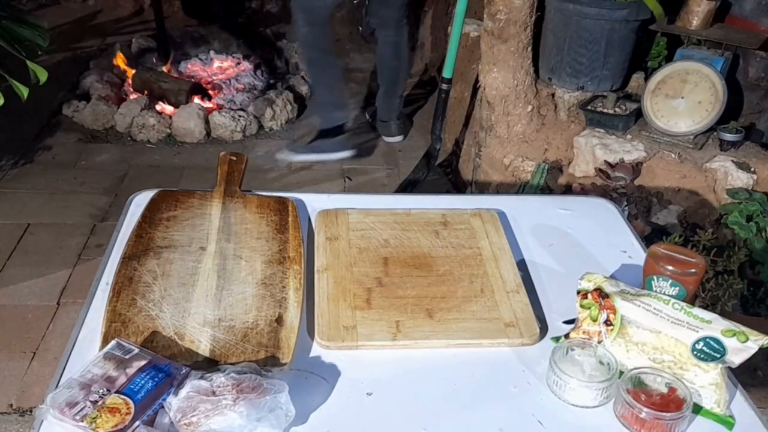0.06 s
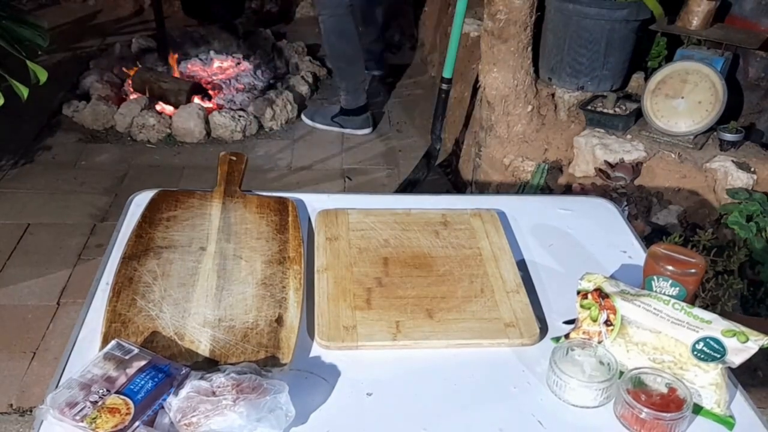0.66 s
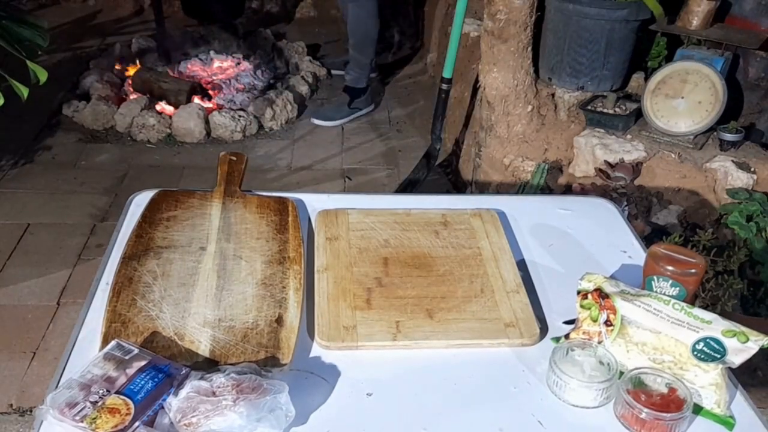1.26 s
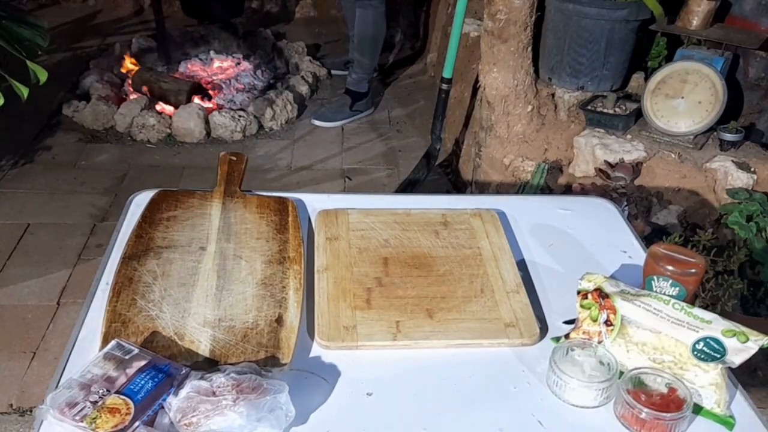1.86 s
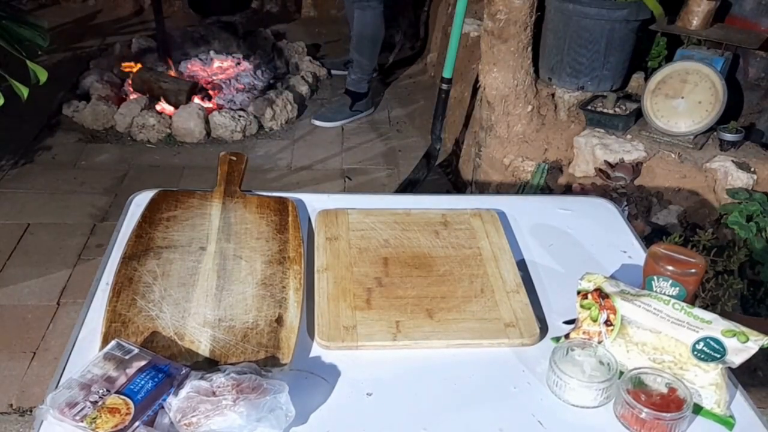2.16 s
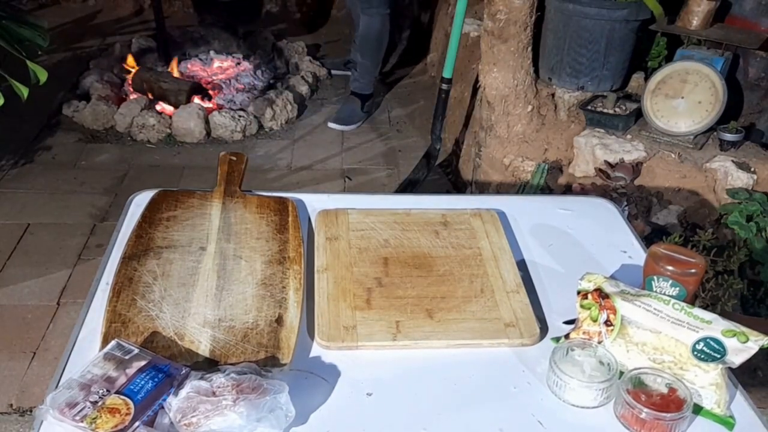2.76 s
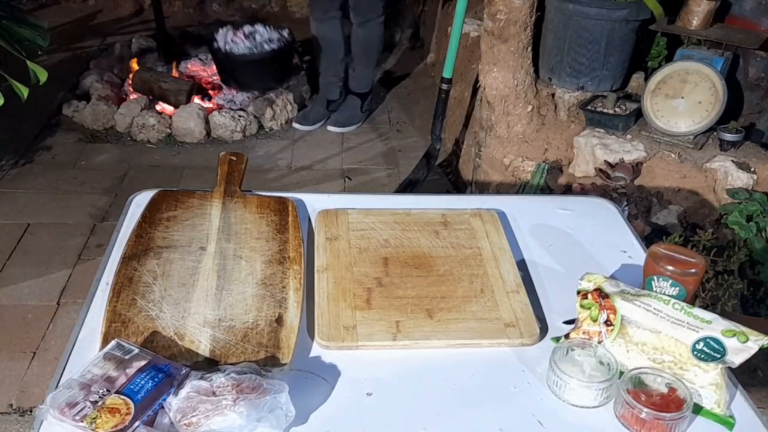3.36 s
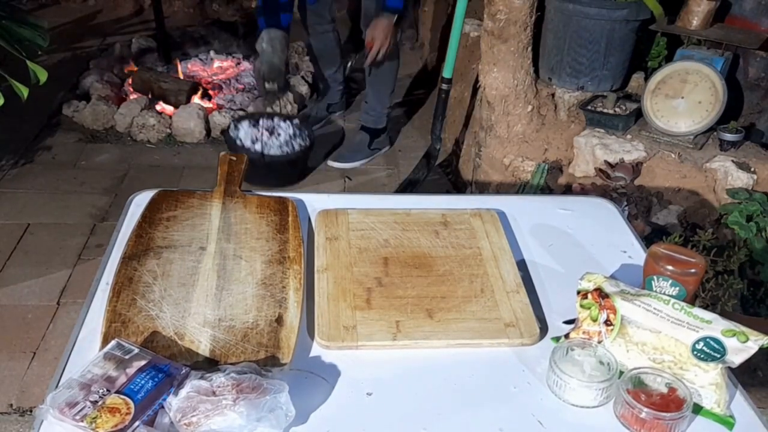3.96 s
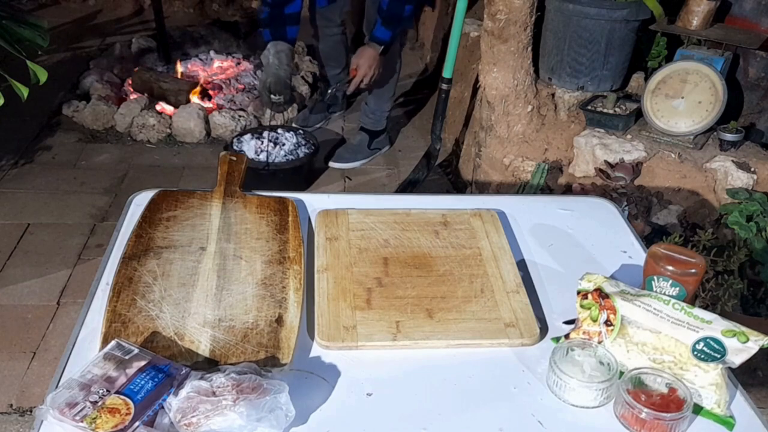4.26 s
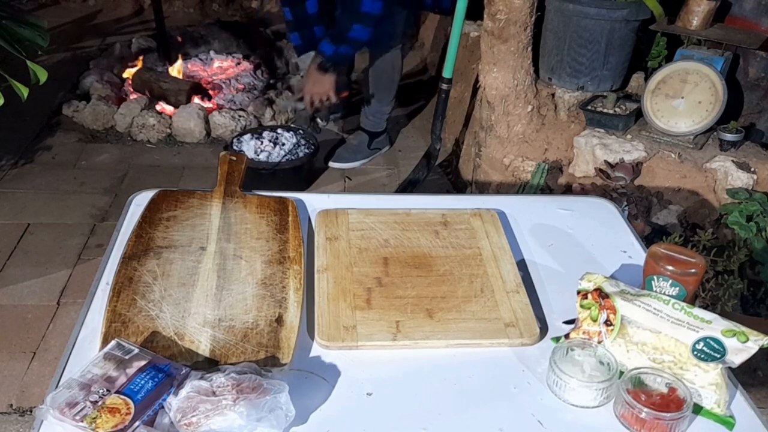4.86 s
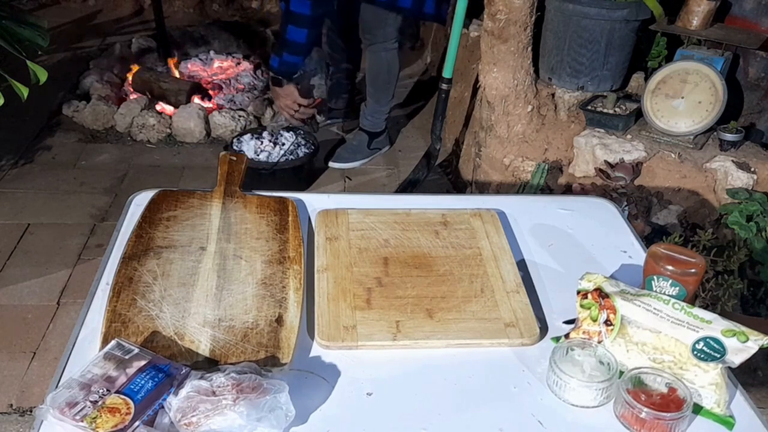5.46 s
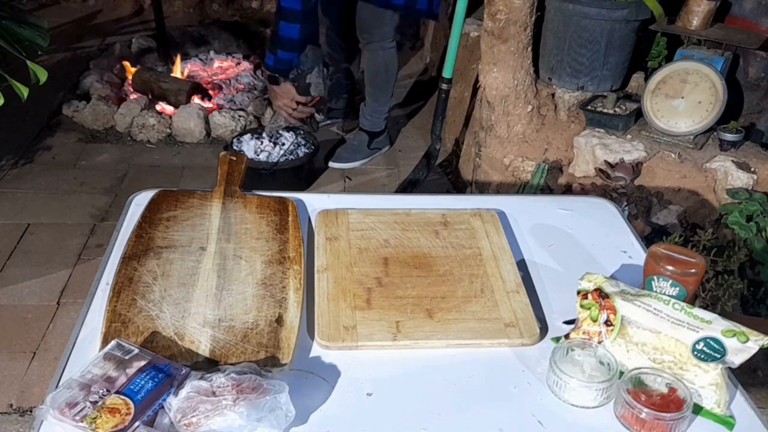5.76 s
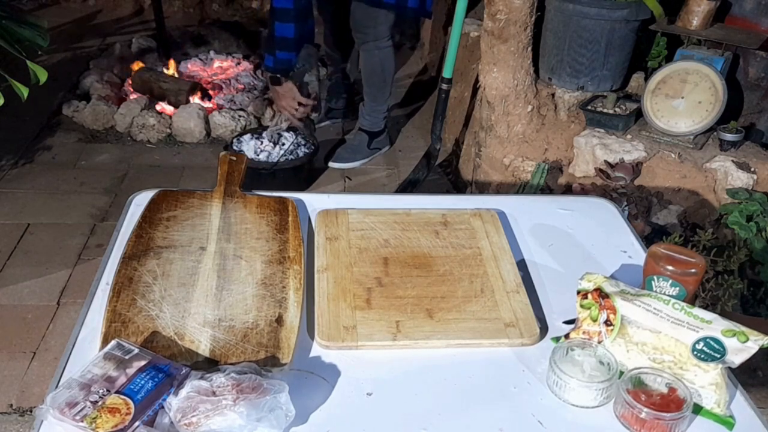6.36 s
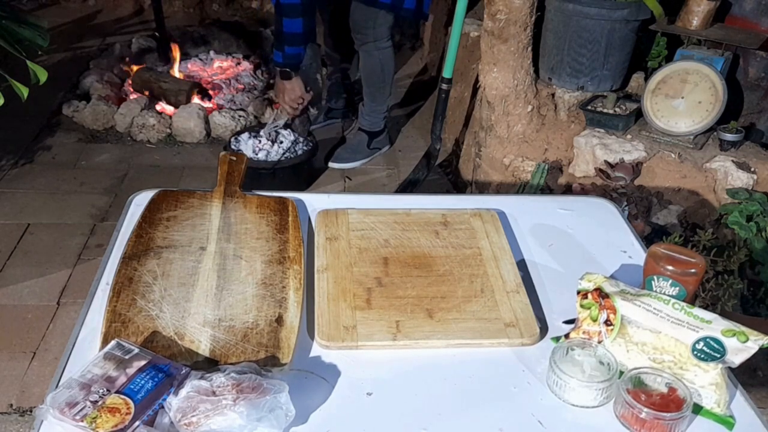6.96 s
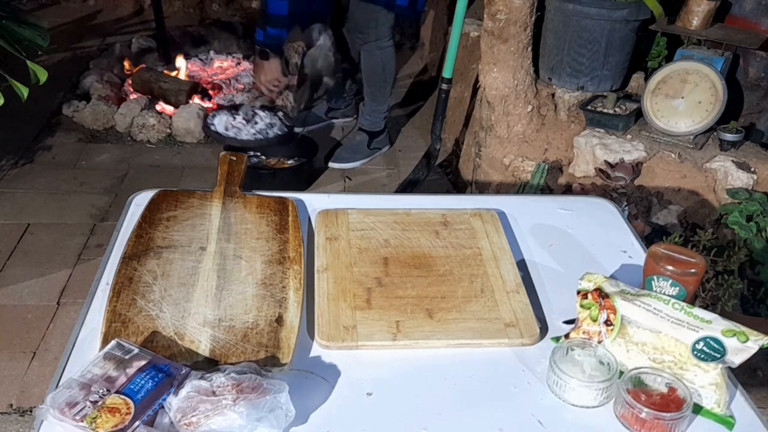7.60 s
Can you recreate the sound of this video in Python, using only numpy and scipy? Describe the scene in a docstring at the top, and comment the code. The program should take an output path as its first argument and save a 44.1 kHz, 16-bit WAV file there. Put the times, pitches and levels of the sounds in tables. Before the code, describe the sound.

Faint night air rumbles throughout with a distant engine's low hum and a few barely audible ember ticks. Shoes step on gritty paving from about 0.3 seconds, slide softly near 1 second, and crack some grit around 1.3. At 2.1 seconds coals give a short, distinct crunch. More scuffs and steps follow between 2.6 and 3.7 seconds. Just after 4 seconds comes the loudest sound: a heavy cast-iron pot clanks onto the paving, ringing briefly and rocking to rest by 4.4, with a clink of its wire handle. Soft scuffing follows. Something knocks on the fire's stones at 5.4 seconds, again more lightly at 5.7, and in a quick cluster from 6.1 to 6.3. The handle clinks at 6.5, then lightly around 7 as the pot is nudged, and once more at 7.5. The knocks carry a short patio echo.

```python
"""Faint ember ticks, night air and a far-off engine's hum come first, then steps up to a campfire.
Shoes scuff and crack the grit on a paved patio. Coals crunch as a cast-iron camp oven is lifted off
the fire; it is set down with a clank, its wire handle clinks, and things knock on the stones round
the fire. Each blow is a click and a short grind, echoed by the patio; iron, wire and stone also ring."""
import sys
import numpy as np
from scipy import signal
from scipy.fft import rfft, irfft, next_fast_len
from scipy.io import wavfile

SR = 44100
rng = np.random.default_rng(int(sys.argv[2]) if len(sys.argv) > 2 else 0)


def generate_wav(signal):
    """Clip the signal to [-1, 1] and save it as 16-bit WAV at the path in sys.argv[1]."""
    frames = np.transpose(np.atleast_2d(signal))
    scaled = np.clip(frames, -1, 1) * 32767
    pcm = np.round(scaled).astype(np.int16)
    wavfile.write(sys.argv[1], SR, pcm)


N = 336527
TIME = np.arange(N) / SR
BLOW_SAMPLES = 24000
BLOW_TIME = TIME[:BLOW_SAMPLES]

# A tone says how strong each pitch is. A width sets side (left-right difference) against mid (shared).
# tone of the night air: f/Hz, level/dB
AIR_TONE = [(20, -29.5), (45, -2.5), (100, 4), (150, 0), (210, -12), (330, -10), (480, -19.5), (900, -20),
            (1400, -24), (2100, -36), (4300, -42.5), (7000, -35), (9000, -37.5), (15000, -30.5)]
# width of the night air: f/Hz, side over mid/dB
AIR_STEREO_WIDTH = [(60, 0), (110, -6.5), (200, -1.5), (380, -5.5), (700, 3), (1290, 4), (2380, -3.5),
                    (4400, 4.5), (8120, -14), (15000, -26.5)]
# notes in the engine's hum: multiple of its turning rate, level/dB
ENGINE_NOTES = [(2, -83.5), (3, -76.5), (4, -63.5), (5, -64), (6, -72.5)]
# embers ticking in the fire: t/s, force/dB
EMBER_TICKS = [(.019, -38.5), (0.76, -45), (.909, -38.5), (6.49, -38)]
# tone of a tick: f/Hz, level/dB
TICK_TONE = [(1000, -12), (3500, -7), (6800, -2), (10000, -4), (14500, -6)]
# shoes landing on gritty paving: t/s, force/dB, dullness/(dB per octave), grinding/s, thud/dB
FOOTFALLS = [(.281, -20.5, 8, 0.0071, 15), (.3, -10, 11, .01, 6.5), (.455, -21.5, 7.5, 0.0038, -10),
             (.795, -21, 29, 0.0034, 1), (.875, -28, 20, .003, 10), (2.642, -27, 5.5, .0022, -17),
             (3.3, -9, 11.5, 0.0087, 6.5), (3.482, -28, 8, 0.0017, -6), (3.728, -33, 16, 0.0037, 32.5)]
# tone of a footfall: f/Hz, level/dB
FOOTFALL_TONE = [(40, -16), (110, 8.5), (170, -9), (300, -0.5), (450, 3), (650, 3.5), (900, 4.5),
                 (1300, -0.5), (1900, 0.5), (2900, -2), (4400, 4), (6500, 8), (9000, 8), (14000, 16.5)]
# soles and cloth sliding: t/s, press/s, hold/s, release/s, grit level/dB, rub over grit/dB
SLIDES = [(0.873, 0.2, 0.081, 0.47, -54, -6), (2.633, 0.025, 0.11, 0.24, -55, -8.5),
          (2.917, 0.036, 0.012, 0.15, -60, -4), (4.642, 0.028, 0.14, 0.24, -76.5, 5.5),
          (4.783, .1, 0.093, 0.29, -60.5, -0.5), (6.764, 0.089, .015, 0.31, -68, 3)]
# tone of the dull rub in a slide: f/Hz, level/dB
SLIDE_RUB_TONE = [(150, 15.5), (350, 10), (800, 7), (1500, -1.5), (2500, -58)]
# tone of the grit in a slide: f/Hz, level/dB
SLIDE_GRIT_TONE = [(700, -12.5), (1200, -1), (1700, 4.5), (2400, 5.5), (3300, 0.5), (4600, -0.5),
                   (7000, -0.5), (8500, -8.5), (12000, -3), (15500, -11)]
# coarse grit cracking under a sole: t/s, force/dB
GRIT_SNAPS = [(1.238, -17), (1.264, -16.5), (1.287, -15), (1.328, -22.5), (2.659, -24), (2.763, -14.5)]
# tone of a snap: f/Hz, level/dB
SNAP_TONE = [(900, -15), (2000, -0.5), (4200, 4), (7000, -4), (14000, 2.5)]
# coals giving way: t/s, force/dB, grinding/s
COAL_CRUNCHES = [(2.073, -9, 0.011), (2.096, 10, 0.0056)]
# tone of a crunch: f/Hz, level/dB
CRUNCH_TONE = [(88, -40), (150, -13), (331, -1.5), (409, -11.5), (649, -3.5), (787, -8), (1010, -8),
               (1910, -7), (3270, -18), (3540, -12), (7210, -27.5), (15000, -53)]
# the oven hitting the paving: t/s, force/dB, dullness/(dB per octave), grinding/s, thud/dB
OVEN_CLANKS = [(4.0665, 27.5, 21.5, 0.0022, -7), (4.125, 2.5, 8.5, 0.0068, 11.5),
               (4.177, 0, 5.5, 0.0057, 4), (4.187, 8, 84, 0.0012, 7.5), (4.215, -7.5, 8, 0.02, 9.5),
               (4.2865, 0.5, 4, 0.0023, 17), (4.378, -17.5, 3, .0035, -5), (6.936, -19, 6, 0.0077, 23),
               (6.97, -17.5, 9, 0.01, 16.5), (7.028, -20, 7.5, 0.0054, 15.5)]
# tone of a clank: f/Hz, level/dB
CLANK_TONE = [(40, -18), (110, 7), (160, 7), (230, 0), (320, 7.5), (430, 2), (520, -1.5), (850, 2),
              (1200, -11.5), (1900, -12.5), (2900, -2.5), (6500, -1.5), (9000, -8.5), (15000, -1)]
# notes the cast iron rings with: f/Hz, level/dB, t60/s (the time to fade by 60 dB)
IRON_NOTES = [(141, -7, .3), (301, -5, .22), (439, 5, .17), (604, -8, .25), (706, -6, .22), (875, -4, .18),
              (1005, 0, .19), (1315, -7, .18), (1388, -5, .28), (1497, -11, .2), (1650, -6, .27),
              (2038, -9, .26), (2149, -4, .3), (2492, -6, .17), (2753, -1, .22), (3095, -3, .17),
              (3537, -3, .25), (4102, -4, .3), (5055, 2, .17), (5900, 5, .16)]
# the wire handle clinking: t/s, force/dB, dullness/(dB per octave), grinding/s
HANDLE_CLINKS = [(4.288, 4, 15.5, .0012), (4.542, -39, -1, 0.0037), (4.779, -35.5, -0.5, .004),
                 (6.094, -22.5, 7.5, 0.0052), (6.519, -7.5, 4.5, 0.0069), (6.822, -29.5, 6, .008),
                 (6.87, -19, 10.5, 0.0084), (6.938, -21, 6.5, 0.012), (7.057, -19.5, 6, 0.0049),
                 (7.53, -20.5, 12, .008)]
# tone of a clink: f/Hz, level/dB
CLINK_TONE = [(100, -13), (400, 5.5), (1200, -9.5), (1800, -12), (2500, 1.5), (3400, 2.5), (4500, 6.5),
              (6500, 5), (9000, -2.5), (14000, -1.5)]
# notes the wire rings with: f/Hz, level/dB, t60/s
WIRE_NOTES = [(2552, 0, .25), (2945, 7, .15), (3381, 4, .14), (3935, 0, .18), (4520, 4, .13),
              (5636, 1, .18), (5943, 4, .18), (6788, 3, .13), (8290, 2, .12), (8856, 1, .18)]
# knocks on the stones: t/s, force/dB, dullness/(dB per octave), grinding/s, thud/dB
STONE_KNOCKS = [(5.4, 0.5, 16.5, 0.0054, -8.5), (5.683, -14.5, 15, .006, 9.5), (6.1, -11.5, 16, 0.013, 14),
                (6.14, -9.5, 12, 0.0064, 2), (6.203, -2.5, 7.5, 0.0022, -0.5), (6.209, 0, 8.5, 0.0014, -21),
                (6.3075, -3, 14.5, 0.0024, -0.5)]
# tone of a knock: f/Hz, level/dB
KNOCK_TONE = [(40, -10.5), (110, 17), (170, -6.5), (300, 5), (450, 1), (650, 1), (900, 5.5), (1300, -1.5),
              (1900, -5.5), (2900, -4), (4400, -3.5), (6500, 1), (9000, -5), (14000, -3.5)]
# notes the stones ring with: f/Hz, level/dB, t60/s
STONE_NOTES = [(880, 0, .09), (1060, 4, .08), (1290, 8, .1), (1560, 0, .09), (1720, -1, .1),
               (2570, -1, .12), (3420, -3, .1), (4370, 3, .14), (6600, 5, .22)]
# tone of the direct sound, dulled by a table in its way: f/Hz, level/dB
DIRECT_TONE = [(150, -3), (700, 3), (1500, -4), (4000, -20), (12000, -22)]
# width of the echoes off walls and paving: f/Hz, side over mid/dB
PATIO_WIDTH = [(100, -15.5), (220, -11.5), (400, -8.5), (800, 0), (1500, -3), (4400, 1), (8000, -6.5),
               (15000, -17)]
# tone of the late echoes: f/Hz, level/dB
ECHO_TAIL_TONE = [(100, -1.5), (300, -3), (1000, -1), (3000, 1), (7000, -3), (15000, 1)]
# how the left side differs from the right, slightly brighter on the left: f/Hz, left over right/dB
LEFT_TONE = [(100, -1.5), (1500, 0.5), (4000, -0.4), (9000, 1)]


def from_db(db):
    """Turn decibels into a number to multiply by."""
    return 10 ** (np.asarray(db) / 20)


def rms_one(x):
    """Scale a signal so that its average strength (rms) is 1."""
    return x / np.sqrt(np.mean(x ** 2) + 1e-20)


def energy_one(x):
    """Scale a signal to the energy of a one-sample click of height 1."""
    return rms_one(x) / np.sqrt(x.shape[-1])


def at_hz(points, hz):
    """Read between the rows of an f/Hz, level/dB table, with octaves evenly spaced."""
    pitches, levels = np.transpose(points)
    return np.interp(np.log(np.maximum(hz, 1)), np.log(pitches), levels)


def colour(x, *tones):
    """Filter a sound by the sum of the given tone tables."""
    size = 2 * next_fast_len(x.shape[-1] // 2 + 1)
    hz = np.arange(size // 2 + 1) * SR / size
    gain = from_db(sum(at_hz(tone, hz) for tone in tones))
    cepstrum = irfft(np.log(gain))
    # fold it in half so that nothing sounds before its cause (minimum phase)
    cepstrum[1:size // 2] *= 2
    cepstrum[size // 2 + 1:] = 0
    return irfft(rfft(x, size) * np.exp(rfft(cepstrum)))[..., :x.shape[-1]]


def wide_noise(samples, width, strength=1):
    """Stereo noise: both ears share the mid; the side is added on the left, taken away on the right."""
    mid, side = strength * rng.standard_normal((2, samples))
    return mid + colour(side, width) * np.array([[1], [-1]])


def drift(rate):
    """A smooth random wobble of size about 1, with about `rate` turns a second."""
    stride, warm_up = 40, 2000
    memory = np.exp(-2 * np.pi * stride * rate / SR)
    noise = rng.standard_normal(N // stride + warm_up + 2)
    slow = signal.lfilter([1], [1, -2 * memory, memory * memory], noise)[warm_up:]
    return np.interp(np.arange(N) / stride, np.arange(len(slow)), rms_one(slow))


def add(out, start_s, sound):
    """Mix a sound in at the given time."""
    start = int(start_s * SR)
    out[:, start:start + sound.shape[-1]] += sound[:, :N - start]


def fade(t60):
    """A curve that falls 60 dB in t60 seconds."""
    return from_db(-60 * BLOW_TIME / t60)


def patio(direct_db, early_t60, tail_db, gap_s=0.001, tail_t60=0.42):
    """How a click sounds on the patio: dulled direct sound, dense early echoes, a weak longer tail."""
    direct = colour(1.0 * (BLOW_TIME == 0), DIRECT_TONE)
    build_up = 1 - np.exp(-(BLOW_TIME / gap_s) ** 2)
    early = wide_noise(BLOW_SAMPLES, PATIO_WIDTH) * fade(early_t60) * build_up
    tail_noise = colour(wide_noise(BLOW_SAMPLES, PATIO_WIDTH), ECHO_TAIL_TONE)
    tail = tail_noise * fade(tail_t60) * (1 - fade(early_t60))
    return from_db(direct_db) * direct + energy_one(early) + from_db(tail_db) * energy_one(tail)


def contact(grinding_s, even_s, grain_db=3.0):
    """A click, then tiny slips as grit is crushed; grinding longer than even_s hides the click."""
    age = BLOW_TIME / max(grinding_s, 1e-4)
    click = age == 0
    slips = rng.standard_normal(BLOW_SAMPLES) * from_db(grain_db * rng.standard_normal(BLOW_SAMPLES))
    return click + (grinding_s / even_s) ** 2 * energy_one(slips * age * np.exp(-age))


def force_tone(force_db, dullness_db, thud_db, knee_hz=2290, thud_hz=356.4):
    """The tone of one blow: a soft contact loses treble, a heavy one adds bass."""
    hz = np.geomspace(40, 18000, 40)
    octaves_over_knee = np.log2(np.hypot(1, hz / knee_hz))
    bass = 1 / (1 + np.square(hz / thud_hz) ** 2)
    return np.column_stack([hz, force_db - dullness_db * octaves_over_knee + thud_db * bass])


def flattening_tone(burst):
    """The tone table that evens out a burst's broad bands but keeps its fine ripple."""
    power = np.mean(np.abs(rfft(burst)) ** 2, axis=0)
    edges_hz = np.geomspace(260, 20000, 28) - 240
    bins = (edges_hz * burst.shape[-1] / SR).astype(int)
    band_power = np.add.reduceat(power, bins)[:-1] / np.diff(bins)
    centres_hz = (edges_hz[:-1] + edges_hz[1:]) / 2
    return np.column_stack([centres_hz, -10 * np.log10(band_power)])


def ringing(notes, force, swell_s=0.003):
    """Each note rings about as hard as the blow is at its pitch, a little out of step in each ear."""
    hz, level_db, t60 = np.array(notes, float).T
    phase = 2 * np.pi * rng.random(len(hz))
    ear_phase = phase + rng.standard_normal((2, len(hz))) * np.minimum(hz / 1200, 2)
    gain = from_db(level_db + at_hz(force, hz) + rng.normal(0, 3.0, len(hz)))
    rise = 1 - np.exp(-BLOW_TIME / swell_s)
    out = 0
    for k in range(len(hz)):
        wave = np.sin(2 * np.pi * hz[k] * BLOW_TIME + ear_phase[:, [k]])
        out += gain[k] * energy_one(wave * fade(t60[k]) * rise)
    return out


def blows(table, tone, direct_db, early_t60, tail_db,
          notes=(), ring_db=None, even_s=0.0046, spots=3, damping_s=0.046):
    """Each blow is a contact echoed by the patio, plus the ring of the thing struck if it has notes."""
    out = np.zeros((2, N))
    echoes = [rfft(patio(direct_db, early_t60, tail_db)) for _ in range(spots)]  # each spot has its own
    for k, (start_s, force_db, dullness_db, grinding_s, *thud_db) in enumerate(table):
        force = force_tone(force_db, dullness_db, sum(thud_db))  # light things have no thud
        burst = irfft(echoes[k % spots] * rfft(contact(grinding_s, even_s)))
        add(out, start_s, colour(burst, force, tone, flattening_tone(burst)))
        if len(notes):
            freedom = 1 / (1 + (grinding_s / damping_s) ** 2)  # a lingering contact weakens the ring
            add(out, start_s, freedom * from_db(ring_db) * ringing(notes, force))
    return out


def night_air(level_db=-61):
    """The outdoor air rumbles steadily, with a faint hiss."""
    return from_db(level_db) * rms_one(colour(wide_noise(N, AIR_STEREO_WIDTH), AIR_TONE))


def far_engine(turning_hz=22.95, waver=0.18, wander_rad=0.24):
    """Only an engine's low notes carry this far; each wavers in strength and timing on the way."""
    out = 0
    for multiple, level_db in ENGINE_NOTES:
        phase = 2 * np.pi * multiple * turning_hz * TIME + wander_rad * drift(0.53)
        strength = from_db(level_db) * (1 + waver * drift(21.0))
        out += np.sqrt(2) * strength * np.sin(phase)
    return out


def embers(snap_s=0.0012):
    """Each ember ticks with a tiny burst of noise and no echo."""
    out = np.zeros((2, N))
    for start_s, force_db in EMBER_TICKS:
        snap = energy_one(rng.standard_normal(BLOW_SAMPLES) * np.exp(-BLOW_TIME / snap_s))
        add(out, start_s, from_db(force_db) * colour(np.array([snap, snap]), TICK_TONE))
    return out


def footsteps():
    """Shoes land on the paving and crush the grit under them."""
    return blows(FOOTFALLS, FOOTFALL_TONE, direct_db=-7.5, early_t60=0.16, tail_db=-9.0, even_s=0.002)


def slide_pressure(start_s, press_s, hold_s, release_s):
    """The pressure of one slide builds, holds, then falls 60 dB over the release."""
    t = TIME - start_s
    rise = np.clip(t / press_s, 0, 1) ** 1.5
    released = np.clip((t - press_s - hold_s) / release_s, 0, 2)
    return rise * from_db(-60 * released)


def scuffs(grains_per_s=250, size_spread_db=2.0, spray_s=0.0022, dust_db=6.0, judder_db=0.4):
    """Sliding soles and cloth rub dully and break grains of grit, catching and slipping unevenly."""
    rub = rms_one(colour(wide_noise(N, PATIO_WIDTH), SLIDE_RUB_TONE))
    sizes = from_db(size_spread_db * np.minimum(rng.exponential(1, N), 4))
    grains = sizes * (rng.random(N) < grains_per_s / SR)
    # each grain breaks in a brief spray of noise, over the even hiss of the finest dust
    sprays = rms_one(signal.lfilter([1], [1, -np.exp(-1 / (spray_s * SR))], grains))
    crackle = wide_noise(N, PATIO_WIDTH, strength=sprays + from_db(dust_db))
    grit = rms_one(colour(crackle, SLIDE_GRIT_TONE))
    out = 0
    for *timing, grit_db, rub_db in SLIDES:
        out += slide_pressure(*timing) * from_db(grit_db) * (grit + from_db(rub_db) * rub)
    return out * from_db(judder_db * drift(31))


def grit_cracks(dullness_db=8, grinding_s=0.0016):
    """Coarse grains break under a turning sole with short, bright snaps."""
    snaps = [(start_s, force_db, dullness_db, grinding_s) for start_s, force_db in GRIT_SNAPS]
    return blows(snaps, SNAP_TONE, direct_db=-13.0, early_t60=0.14, tail_db=-22.0, spots=2)


def coals():
    """Charcoal gives way as the oven is freed: a short swelling crunch with no ring."""
    crunches = [(start_s, force_db, 0, grinding_s) for start_s, force_db, grinding_s in COAL_CRUNCHES]
    return blows(crunches, CRUNCH_TONE, direct_db=-9.5, early_t60=0.18, tail_db=-18.0,
                 even_s=0.0029, spots=1)


def oven():
    """The iron oven lands, rocks, settles and is later nudged; each blow sets it ringing."""
    return blows(OVEN_CLANKS, CLANK_TONE, direct_db=-3.5, early_t60=0.16, tail_db=-11.5,
                 notes=IRON_NOTES, ring_db=-23.0)


def wire_handle():
    """The light wire handle clinks with high notes and no thud."""
    return blows(HANDLE_CLINKS, CLINK_TONE, direct_db=-6.5, early_t60=0.19, tail_db=-15.5,
                 notes=WIRE_NOTES, ring_db=-17.5, even_s=0.0038, damping_s=0.01)


def stones():
    """Things knock on the stones round the fire, which ring briefly."""
    return blows(STONE_KNOCKS, KNOCK_TONE, direct_db=-6.5, early_t60=0.17, tail_db=-11.5,
                 notes=STONE_NOTES, ring_db=-22.0, even_s=0.0036, damping_s=0.0077)


def scene():
    """The oven, the person at the fire and the night around them."""
    knocks = oven() + footsteps() + stones() + wire_handle()
    crackles = coals() + grit_cracks() + embers() + scuffs()
    return knocks + crackles + far_engine() + night_air()


def record(dry, cutoff_hz=15900):
    """The left side has a little less bass and a little more treble; the highest treble is cut steeply."""
    left, right = dry
    heard = np.array([colour(left, LEFT_TONE), right])
    treble_cut = signal.ellip(12, 0.1, 80, cutoff_hz, fs=SR, output="sos")
    return signal.sosfilt(treble_cut, heard)


dry = scene()
out = record(dry)
generate_wav(out)
```